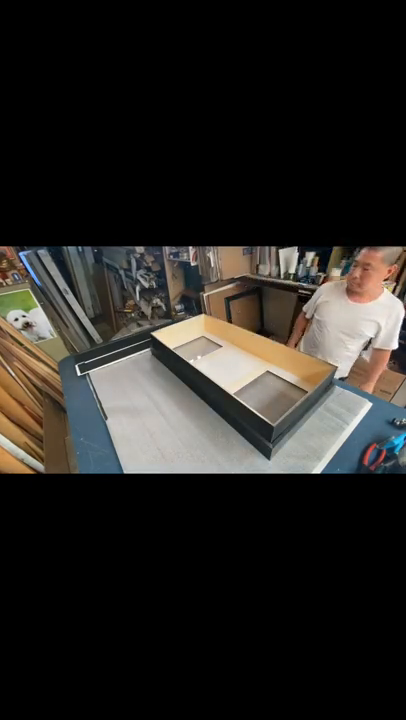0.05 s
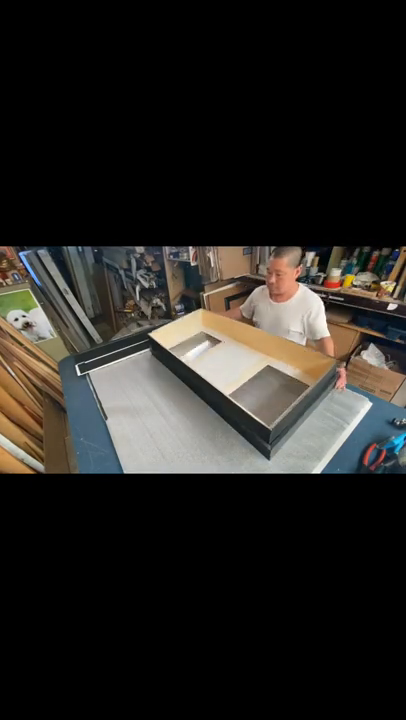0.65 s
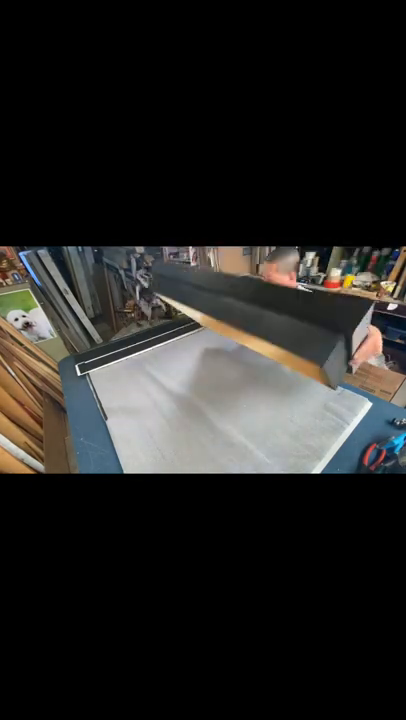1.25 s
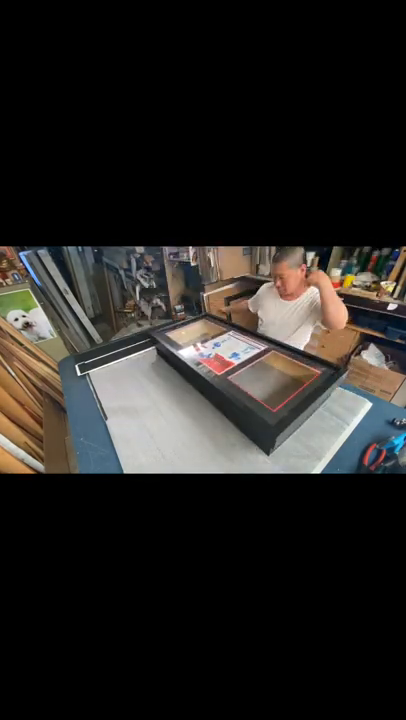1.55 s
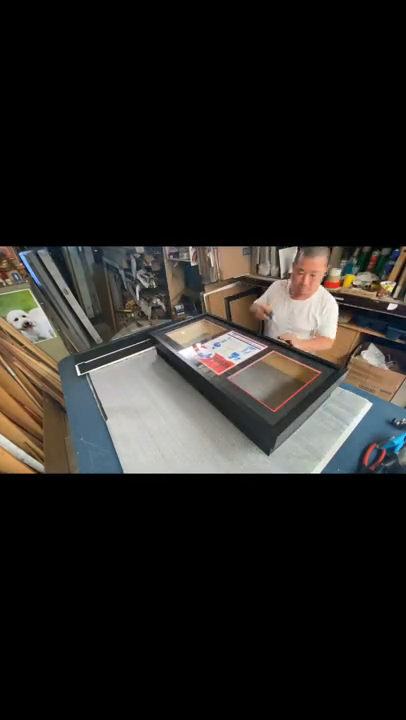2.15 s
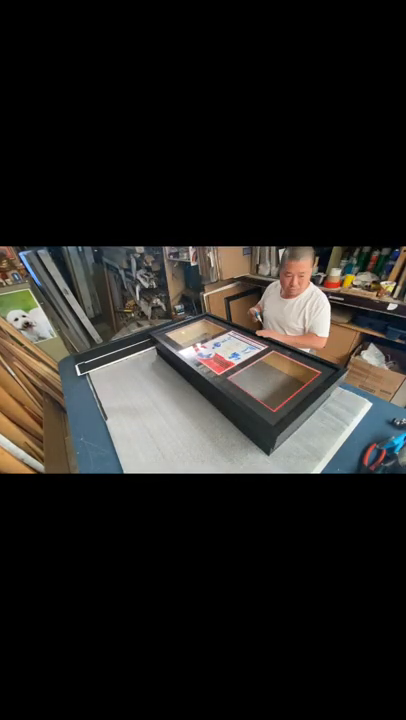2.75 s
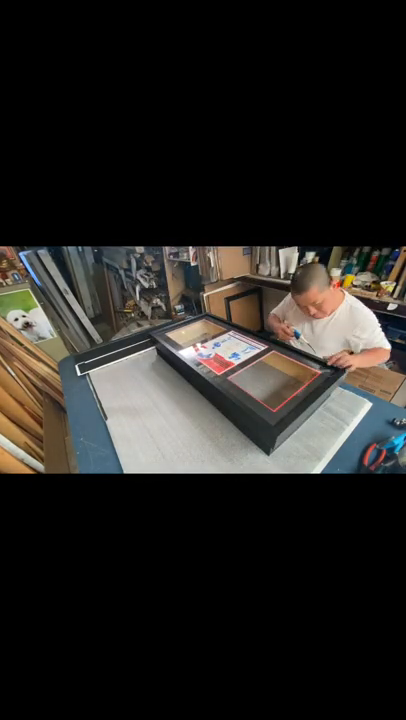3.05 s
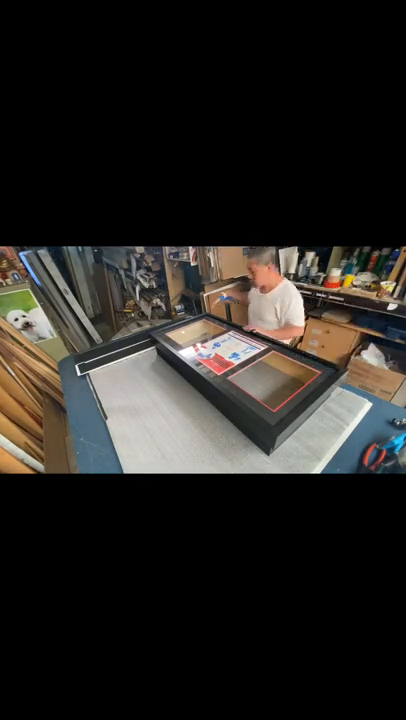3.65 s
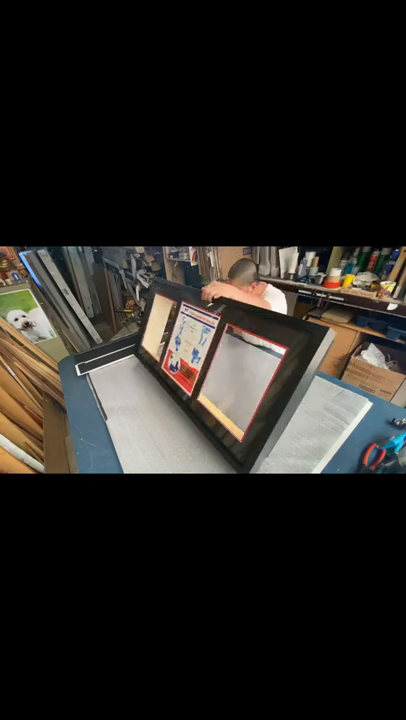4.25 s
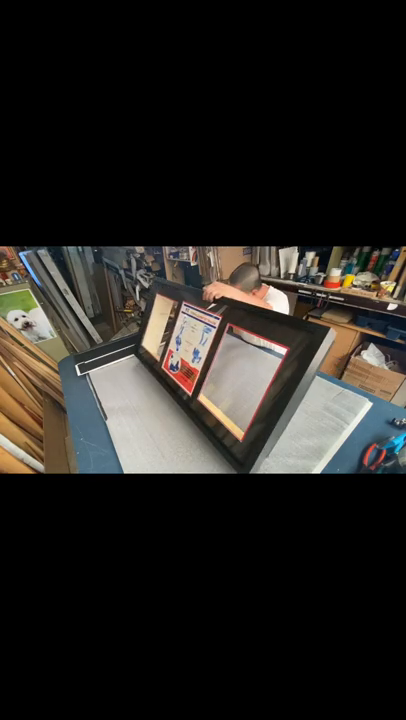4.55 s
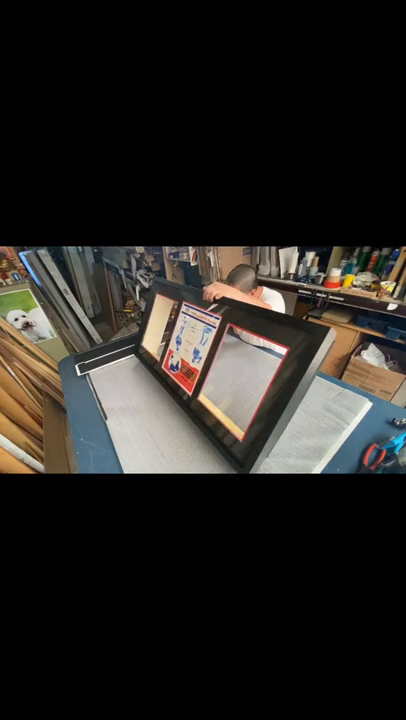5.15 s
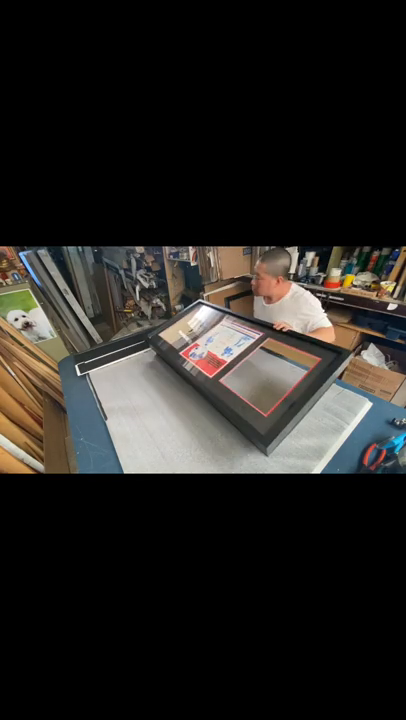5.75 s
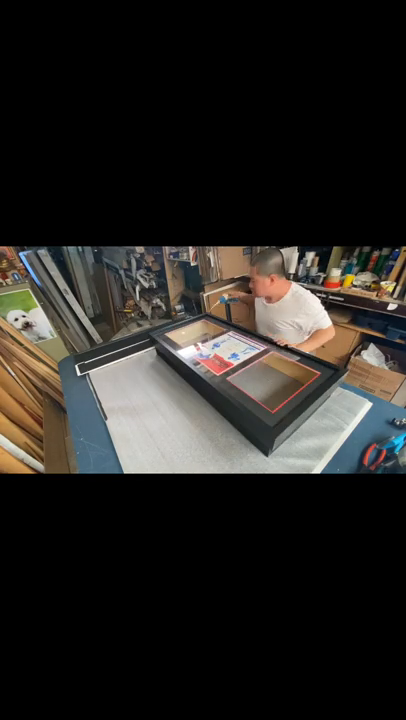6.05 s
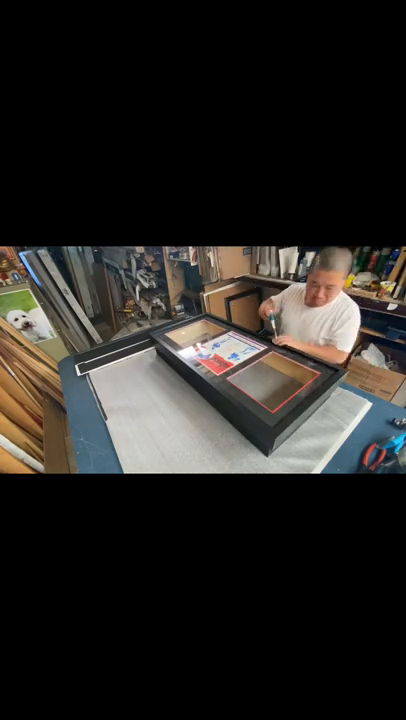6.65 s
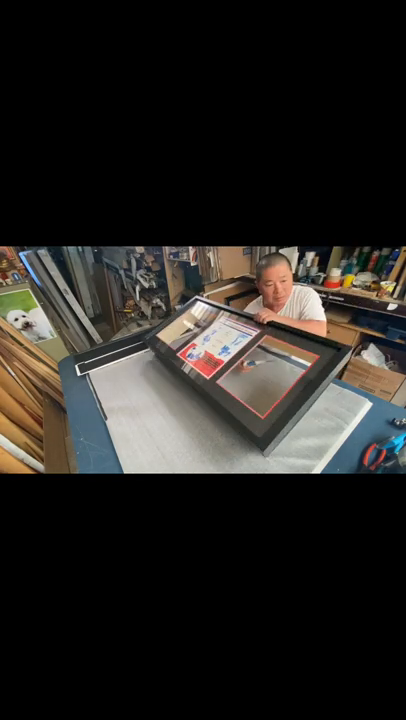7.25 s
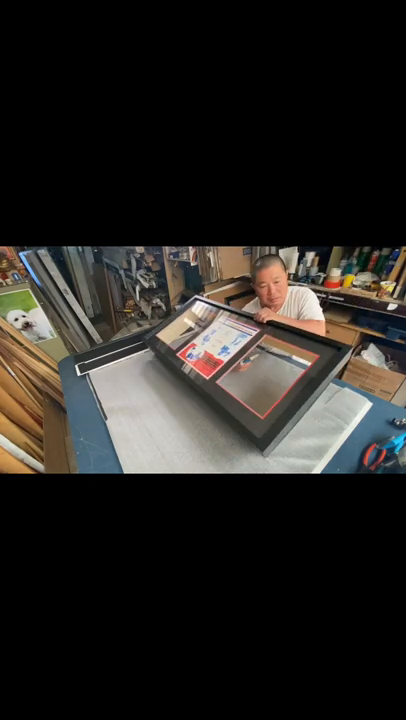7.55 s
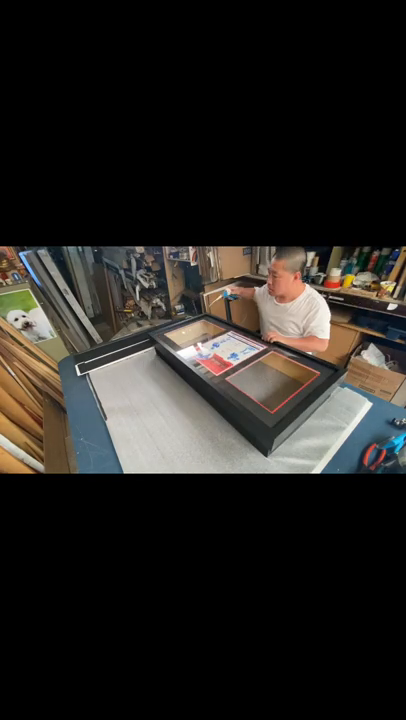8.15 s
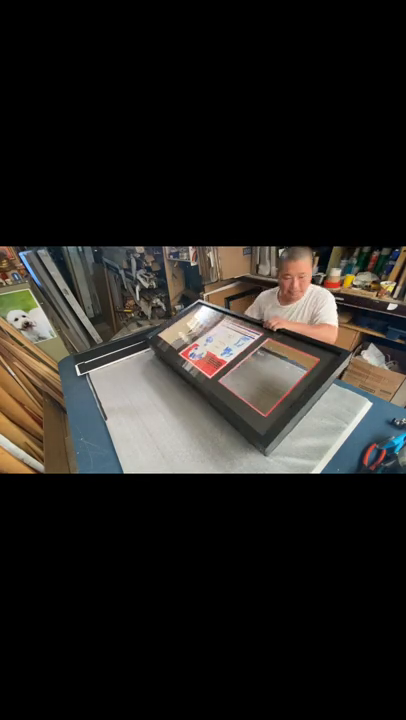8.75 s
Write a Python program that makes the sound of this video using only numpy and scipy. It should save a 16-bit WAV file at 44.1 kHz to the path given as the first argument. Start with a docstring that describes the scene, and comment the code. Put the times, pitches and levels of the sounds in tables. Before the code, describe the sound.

A small compressor hums and buzzes in a workshop. A wooden box frame squeaks and bumps softly as it is turned over. Then an air gun blows it out in repeated short and long bursts, bright and hissing in the open, harsh on the edges and hollow inside the box. The jet sometimes whistles in gaps and puffs against the microphone, while the hum continues behind.

```python
"""Air gun and compressor in a workshop.

Dust is blown out of a wooden box frame. The turbulent jet hisses in bursts: bright in free air, harsh
on the edges, hollow where it excites the box's air resonances. It sings in gaps and buffets the
microphone in passing; the handled frame squeaks and bumps. Behind it are faint sinking tones and the
harmonic hum of a small piston compressor, which ducks during bursts in free air and creeps back."""
import sys
import numpy as np
from scipy import signal
from scipy.fft import rfft, irfft, next_fast_len
from scipy.io import wavfile
from scipy.ndimage import uniform_filter1d, map_coordinates

SR = 44100
rng = np.random.default_rng(int(sys.argv[2]) if len(sys.argv) > 2 else 0)


def materialize(psi):
    """Save the field psi as 16-bit PCM at rate SR to the path in sys.argv[1].

    A 1-D psi becomes a single channel; in a 2-D psi each row is a channel.
    """
    bounded = np.clip(np.atleast_2d(psi).T, -1, 1)
    quanta = np.round(bounded * 32767).astype(np.int16)
    wavfile.write(sys.argv[1], SR, quanta)


N = 392040
TIME = np.arange(N) / SR
CUTOFF_HZ = 15750

# Distant sinking tones, one curve each: t/s, f/Hz, level/dB
FAR_GLIDES = [
    [(.05, 485, -67), (.22, 475, -47), (.38, 460, -55), (.55, 444, -46), (.8, 430, -52)],
    [(.1, 945, -56), (.28, 950, -64), (.65, 885, -56), (.8, 816, -48), (1.05, 775, -56)],
    [(6.55, 401, -86), (6.85, 378, -62), (7.2, 379, -68), (7.45, 361.3, -64), (7.75, 351.5, -62.5),
     (8.0, 348, -89)],
]

# Compressor speed: t/s, stroke rate/Hz
STROKE_RATE = [(0, 127.12), (1, 127.04), (6, 127.06), (7, 127.14), (8.9, 127.16)]
# Its harmonics: multiple of the stroke rate, mid level/dB (common to both channels), side level/dB
HARMONICS = [(2, -39.5, -110), (4, -47.5, -59), (6, -57.5, -88), (8, -51.5, -74), (10, -50, -58),
             (12, -51.5, -59), (13, -55, -75), (14, -55.5, -61), (15, -55, -76), (16, -58.5, -63),
             (17, -75, -74), (18, -52, -62), (19, -46.5, -62), (20, -54.5, -55), (21, -56.5, -60),
             (23, -58.5, -51), (25, -59.5, -64), (26, -52, -49), (27, -55.5, -52), (28, -60, -56),
             (29, -58.5, -59), (30, -67, -65), (31, -83, -67), (32, -75, -52), (34, -47.5, -45),
             (35, -52, -51), (36, -59, -57), (37, -53, -45), (38, -55.5, -52), (39, -51, -53),
             (40, -63, -58), (41, -59.5, -59), (47, -68, -53), (48, -57, -60), (49, -52.5, -57),
             (50, -61, -59), (51, -67, -59), (52, -55.5, -63), (54, -77, -59), (55, -78, -57)]
# Harmonic group gains: t/s, buzz/dB, ring/dB, mid whine/dB, side whine/dB
GROUP_GAINS = [(0, -2.5, 1.5, -3.5, -3), (.4, -0.5, 4.5, -4, -1), (.7, 3.5, 4, -3, 0),
               (1.1, 0.5, 6.5, -4, -2), (1.35, 2, 3.5, -2, 0), (1.7, 0.5, 2, 2, -1), (2.3, 0.5, 3, 1, 2),
               (2.8, 4.5, 5.5, 1, 3), (3.6, 1, 3.5, -0.5, -1), (5.2, 2.5, 7.5, -4.5, -2),
               (5.75, 3.5, 2, -3, 0), (6.5, 2, 5, 3.5, 2), (7.5, 5.5, 6, -6.5, 1), (8.1, 3.5, 2, 0, 0),
               (8.89, 6, 5, 0, 3)]
# Weak top harmonics: f/Hz, typical level/dB
FIZZ_SPECTRUM = [(7000, -73), (9000, -71), (11500, -79), (14500, -90)]
# Modes of the pump's loose parts: f/Hz, bandwidth/Hz, level/dB
CASING_MODES = [(2634, 46, -52.5), (3190, 54, -59), (5220, 50, -56), (7850, 90, -61.5), (10500, 60, -67.5)]
# Air and valve noise of the pump: f/Hz, relative density/dB
PUMP_SPECTRUM = [(40, -37), (100, -35), (135, -18.5), (170, -17), (220, 2.5), (300, 5.5), (420, -1),
                 (620, -3), (900, -8.5), (2000, -6.5), (3200, -9), (4800, -3), (5700, -9.5), (9000, -16.5),
                 (15500, -30.5)]
# Its stereo image: f/Hz, coherence, left phase lead/rad
PUMP_COHERENCE = [(60, .45, 0), (160, .95, 0), (300, .88, 0), (1200, .65, .4), (2400, .55, 1.1),
                  (3300, .6, 1.9), (4700, .65, 2.4), (6500, .45, 3.1), (9000, .45, 4.2), (12000, .4, 5.6),
                  (15500, .3, 7.2)]
# The hum ducks during bursts in free air: start/s, end/s, initial gain/dB
HUM_DUCKS = [(1.768, 2.503, -15.5), (3.417, 3.747, -17), (5.933, 6.598, -15), (8.19, 8.52, -17)]
# Brief dips of the low drone: t/s, half length/s, gain/dB
DRONE_DIPS = [(2.57, 0.13, -15.5), (6.678, 0.055, -9), (7.918, 0.026, -14), (8.007, .025, -12),
              (8.6, 0.14, -13.5)]

# Squeaks as the frame is gripped and turned: t/s, f/Hz, peak/dB
GRIP_SQUEAKS = [(.38, 3520, -31), (.425, 5240, -34), (.62, 3170, -28), (.98, 3480, -27.5),
                (4.77, 6130, -38), (4.83, 6130, -32), (1.58, 3520, -30), (1.725, 10300, -39),
                (2.608, 2280, -47), (5.63, 3550, -39), (5.832, 2900, -37)]
# Bumps as it is tipped over and laid down: t/s, level/dB
FRAME_BUMPS = [(1.02, -31), (1.625, -32)]
# Low modes of the frame: f/Hz, bandwidth/Hz, relative level/dB
FRAME_MODES = [(296, 23, 0), (345, 50, -6), (460, 50, -5), (600, 64, -3)]

# The jet sweeps past the microphone: t/s, half length/s, small puff level/dB, low rush level/dB
PASSING_GUSTS = [(2.421, 0.09, -44, -59), (6.562, 0.054, -44, -55), (8.421, 0.1, -49, -59)]
# The strongest puffs: t/s, level/dB, half length/s, upper band edge/Hz
STRONG_PUFFS = [(2.35, -40, .003, 1600), (2.379, -32, .005, 620), (2.388, -31, 0.005, 700),
                (2.416, -38, 0.0046, 600), (2.437, -27, 0.0044, 1100), (2.447, -35, .004, 700),
                (2.474, -30, 0.0018, 2200), (2.478, -39, .003, 600), (2.503, -43, .003, 1500),
                (2.542, -41, 0.0033, 1300), (2.553, -38, 0.0022, 1700), (3.016, -42, 0.014, 600),
                (3.542, -40, 0.008, 800), (5.226, -34, 0.0026, 1500), (5.322, -31, 0.005, 3800),
                (5.457, -27.5, 0.0041, 2600), (6.532, -31.5, .004, 1700), (6.545, -32.5, 0.0044, 1100),
                (6.558, -32.5, 0.0058, 800), (6.57, -36, .004, 650), (6.596, -38, 0.0056, 600),
                (6.61, -33, 0.006, 620), (8.371, -33, 0.004, 750), (8.387, -37, .004, 900),
                (8.434, -35, 0.0065, 650), (8.461, -38, .004, 500), (8.57, -42, .007, 800),
                (8.593, -42, 0.0047, 600)]

# Bottle-like hums of the box: t/s, half length/s, f/Hz, level/dB
CAVITY_HUMS = [(7.382, .022, 277.6, -47), (7.43, .02, 275, -51)]
# Air resonances of the box: f/Hz, bandwidth/Hz, gain/dB
BOX_MODES = [(656, 70, -2), (922, 150, -3.5), (1222, 108, 0.5), (1625, 180, -1), (1950, 1100, -11)]
# The jet sings in gaps: start/s, end/s, f/Hz, bandwidth/Hz, level/dB
GAP_TONES = [(2.67, 2.786, 8350, 500, -46), (2.674, 2.798, 13400, 400, -45), (3.41, 3.462, 1640, 170, -48),
             (4.19, 4.43, 1250, 260, -55), (4.22, 4.45, 1850, 300, -59), (4.367, 4.563, 11700, 2200, -41),
             (4.4, 5.097, 6120, 70, -52), (4.535, 4.672, 4190, 83, -44), (4.55, 4.721, 1230, 55, -49.5),
             (4.553, 4.7, 1830, 100, -45), (4.64, 4.74, 6700, 230, -43), (4.883, 5.156, 7600, 4000, -38),
             (4.921, 4.942, 1106, 110, -40.5), (4.98, 5.12, 13400, 350, -40), (5.0, 5.1, 7700, 200, -42),
             (5.3, 5.309, 7600, 200, -44), (5.322, 5.333, 1100, 250, -40.5), (5.36, 5.369, 1400, 300, -46),
             (5.752, 5.816, 1050, 180, -41.5), (6.752, 6.768, 1500, 900, -49),
             (6.822, 6.845, 1750, 350, -46.5), (8.307, 8.33, 1280, 90, -51), (7.1, 7.65, 1610, 150, -57),
             (7.227, 7.542, 11300, 690, -42.5)]
# Resonances of one corner: f/Hz, bandwidth/Hz, relative level/dB
CORNER_MODES = [(873, 47, -5.5), (1660, 240, -2), (2180, 270, -8), (2900, 380, 0)]
# The jet is aimed into that corner: start/s, end/s, level/dB
CORNER_AIMS = [(7.066, 7.214, -48.5), (7.516, 7.587, -50.5), (7.76, 7.845, -44.5), (8.76, 8.897, -49)]

# Hiss of the free jet: f/Hz, relative density/dB
HISS_SPECTRUM = [(100, -39), (170, -14.5), (300, -6), (600, -9.5), (1200, -9), (3000, -11), (6000, -4.5),
                 (9000, -1), (12000, 1.5), (15800, 3)]
# Its stereo image: f/Hz, coherence, left phase lead/rad
HISS_COHERENCE = [(200, 0.06, 1.5), (1500, 0.25, -2), (3000, 0, 0.5), (5900, 0.35, -2), (10000, 0.55, -0.5),
                  (15000, 0.4, -0.8)]
# Splash of air on wooden edges: f/Hz, relative density/dB
SPLASH_SPECTRUM = [(200, -43), (700, -48), (1400, -11), (2200, 0), (4000, -1), (7000, 2.5), (10000, 1),
                   (15800, 0)]
# Its stereo image, scattered by the wood: f/Hz, coherence, left phase lead/rad
SPLASH_COHERENCE = [(200, .6, 0), (1500, 0.8, 2), (3000, 0.4, 0.8), (6150, 0.2, 4.5), (15000, 0.3, -6.5)]
# Travel of the nozzle across the bench: t/s, added delay on the right/microseconds
NOZZLE_DELAY = [(1.8, 23), (2.0, 22), (2.25, 3), (2.42, 6), (2.52, 1), (2.66, -75), (2.88, -100),
                (3.02, -100), (3.41, -9), (3.56, 32), (3.9, 24), (5.95, 27), (6.15, 18), (6.35, -10),
                (6.5, 1), (6.7, 20), (7.3, -2), (8.0, 30), (8.2, -12), (8.4, 6), (8.52, 1)]
# Bursts of one tone colour, steadily rising or falling:
# opening/s, closing/s, hiss/dB, splash/dB, box/dB, fall over the burst/dB
PLAIN_BURSTS = [(1.75, 2.509, -37.5, -62, -56.5, -0.5), (2.652, 2.803, -43.5, -41, -54, -2.5),
                (2.873, 3.005, -37.5, -45, -56, 7), (3.409, 3.811, -42.5, -56.5, -75, -2.5),
                (3.897, 3.961, -46.5, -54.5, -55.5, -4), (5.223, 5.462, -51, -43, -48, -4),
                (5.733, 5.823, -63, -51.5, -50, 3), (5.912, 6.838, -36, -48.5, -57, 5.5),
                (7.973, 8.101, -42, -48, -49.5, -1.5), (8.141, 8.528, -42.5, -58, -58.5, -4.5),
                (8.779, 8.95, -54, -48, -57.5, -12)]
# Bursts swept along the inside of the frame, one curve each: t/s, hiss/dB, splash/dB, box/dB
SWEPT_BURSTS = [
    [(4.178, -46, -47.5, -48.5), (4.33, -55, -46.5, -53), (4.375, -40, -40, -54), (4.52, -60, -38.5, -48.5),
     (4.6, -63, -36.5, -42.5), (4.725, -40, -36, -50), (4.795, -50, -49.5, -48), (4.835, -52, -39, -49),
     (4.97, -36.5, -38.5, -50.5), (5.132, -36, -38, -45.5)],
    [(7.078, -46, -52, -47), (7.16, -48, -35, -54), (7.24, -45, -45.5, -62), (7.38, -49, -39.5, -56),
     (7.49, -38.5, -42.5, -58), (7.55, -46, -43, -56), (7.6, -56, -51, -50.5), (7.74, -56, -53.5, -49.5),
     (7.8, -45, -43.5, -58), (7.837, -57, -42, -52)],
]
# The jet catches or slips off an edge: t/s, half length/s, jet gain/dB, further splash gain/dB
EDGE_SPITS = [(2.713, 0.047, -4.5, 10), (3.423, 0.013, 11, 8), (3.445, 0.017, 5.5, -4),
              (3.545, 0.0055, 5, 9), (3.58, 0.0079, 6.5, 5), (3.618, .009, 5.5, 0), (3.652, 0.013, 6, 0),
              (3.796, 0.015, 3, 10.5), (4.243, .005, 4, -7), (4.288, .005, 4.5, -9),
              (4.567, 0.0083, 8.5, -2.5), (4.664, 0.0086, 0.5, 3), (4.695, .008, -1, 0),
              (4.903, 0.0057, 4.5, 3.5), (4.957, .008, 3, -7), (5.3, 0.013, 3.5, 1.5), (5.323, .005, 3, 1),
              (5.355, .02, 0.5, -3), (5.405, .012, 1, 1), (5.456, .01, 4, -6), (5.791, 0.026, 12.5, -2),
              (6.308, 0.067, 5, -5), (6.83, 0.021, 2, 17.5), (7.287, 0.012, 8.5, -12), (8.206, .008, 5, 6),
              (8.236, 0.078, 7.5, -2)]


def from_db(db):
    """Amplitude ratio of a level in decibels."""
    return np.exp(np.asarray(db) * np.log(10) / 20)


def unit_rms(x):
    """Normalisation to unit mean square."""
    return x / np.sqrt(np.mean(x ** 2) + 1e-20)


def in_time(rows):
    """Linear interpolation of each column at every sample."""
    times, *columns = np.transpose(rows)
    return [np.interp(TIME, times, column) for column in columns]


def at_hz(rows, hz):
    """Interpolation of each column on a logarithmic frequency axis."""
    knots, *columns = np.transpose(rows)
    return [np.interp(np.log(hz + 1e-9), np.log(knots), column) for column in columns]


def hump(middle, half_length):
    """A Gaussian envelope of height 1."""
    return np.exp(-np.minimum(((TIME - middle) / half_length) ** 2, 50))


def drift(hz, hop=100):
    """Random modulation: low-passed noise of unit rms."""
    r = np.exp(-2 * np.pi * hz * hop / SR)
    slow = signal.lfilter([1], [1, -2 * r, r * r], rng.standard_normal(N // hop + 1002))[1000:]
    return np.interp(np.arange(N) / hop, np.arange(len(slow)), unit_rms(slow))


def filtered(x, order, hz, kind="low"):
    """A maximally flat filter."""
    return signal.sosfilt(signal.butter(order, hz, kind, fs=SR, output="sos"), x)


def resonate(x, hz, width):
    """Forced response of a damped oscillator, with unit gain at resonance."""
    r = np.exp(-np.pi * width / SR)
    poles = [1, -2 * r * np.cos(2 * np.pi * hz / SR), r * r]
    return signal.lfilter(np.array([1, 0, -1]) * (1 - r * r) / 2, poles, x)


def add_transient(out, start_s, x, peak_db):
    """Superposition of a short sound, scaled to a given peak."""
    start = round(start_s * SR)
    out[..., start:start + x.shape[-1]] += from_db(peak_db) * x / np.abs(x).max()


def stereo_noise(spectrum, image):
    """Partial coherence: the channels share a phase-shifted part of a coloured noise."""
    size = next_fast_len(N)
    hz = np.arange(size // 2 + 1) * SR / size
    left, independent = rfft(rng.standard_normal((2, size)))
    coherence, lead = at_hz(image, hz)
    right = coherence * np.exp(-1j * lead) * left + np.sqrt(1 - coherence ** 2) * independent
    colour = from_db(at_hz(spectrum, hz)[0])
    return unit_rms(irfft(np.array([left, right]) * colour, size)[:, :N])


def far_tones(relative_width=.035, waver_db=2.0, fade_s=0.037):
    """Random quadrature modulation smears each faint, sinking tone into a narrow band of noise."""
    out = np.zeros(N)
    for curve in FAR_GLIDES:
        hz, level_db = in_time(curve)
        gate = np.clip(np.minimum(TIME - curve[0][0], curve[-1][0] - TIME) / fade_s, 0, 1)
        phase = 2 * np.pi * np.cumsum(hz) / SR
        width_hz = relative_width * curve[0][1]
        band = drift(width_hz) * np.sin(phase) + drift(width_hz) * np.cos(phase)
        out += gate * from_db(level_db + waver_db * drift(30)) * band
    return out


def hum_gains(start_db=-4.5, full_db=1, recover_db_per_s=5, sink_db_per_s=8.5, duck_s=0.015):
    """Ducking of rattle and drone: both drop, sink and recover exponentially; the drone also dips."""
    level = start_db + recover_db_per_s * TIME
    for begins, ends, ducked_db in HUM_DUCKS:
        sunk = sink_db_per_s * (np.minimum(TIME, ends) - begins)
        recovered = recover_db_per_s * np.maximum(TIME - ends, 0)
        level = np.where(TIME > begins, ducked_db - sunk + recovered, level)
    level = uniform_filter1d(np.minimum(level, full_db), int(duck_s * SR))
    dips = sum(db * hump(middle, half_length) for middle, half_length, db in DRONE_DIPS)
    return from_db([level, level + 0.84 + dips])


def casing_rasp(stroke, sharpness=1.3, flicker_db=4.5, flicker_hz=18):
    """Forced vibration: a noise pulse on each stroke rings the loose parts, whose levels flicker."""
    noise = rng.standard_normal((2, N)) * .5 + rng.standard_normal(N)
    knocks = noise * np.exp(sharpness * np.cos(stroke))
    out = np.zeros((2, N))
    for hz, width, db in CASING_MODES:
        flicker = from_db(flicker_db * np.minimum(drift(flicker_hz), 1))
        out += from_db(db) * unit_rms(resonate(knocks, hz, width) * flicker)
    return out


def fizz(stroke, size=2048):
    """A cycle repeated every stroke has a line spectrum: weak top harmonics, uneven in each channel."""
    hz = np.arange(size // 2 + 1) * STROKE_RATE[0][1]
    lines = rng.standard_normal((2, len(hz))) + 1j * rng.standard_normal((2, len(hz)))
    lines *= from_db(at_hz(FIZZ_SPECTRUM, hz)[0]) * (hz > FIZZ_SPECTRUM[0][0]) * (hz < CUTOFF_HZ)
    angle = np.arange(size) * 2 * np.pi / size
    cycles = irfft(lines * size / 2, size)
    return np.array([np.interp(stroke % (2 * np.pi), angle, cycle) for cycle in cycles])


def pump_flow(stroke, split_hz, waver_db, throb=0.054, flutter_db=1.1, flutter_hz=45):
    """Unsteady flow gives broadband noise: a wavering rumble, and valve hiss pulsed by the strokes."""
    rush = stereo_noise(PUMP_SPECTRUM, PUMP_COHERENCE)
    rumble = filtered(rush, 1, split_hz)
    pulsation = unit_rms((1 + throb * np.cos(stroke)) * from_db(flutter_db * drift(flutter_hz)))
    valves = filtered((rush - rumble) * pulsation, 2, 170, "high")
    return rumble * from_db(waver_db * drift(16)), valves


def from_the_left(x, shadow_hz=2200, shadow_db=0.9):
    """Acoustic shadowing affects only short waves, so the treble is louder on the near side."""
    treble = filtered(x, 1, shadow_hz, "high")
    return x + treble * (from_db([[shadow_db], [-shadow_db]]) - 1)


def compressor(waver_db=1.5, drone_waver_db=2.5, flow_db=-35.5, drone_top_hz=380):
    """Periodic excitation: the piston's repeated clatter forms a harmonic series over its flow noise."""
    rattle, drone = hum_gains()
    buzz, ring, whine, side_whine = rattle * from_db(in_time(GROUP_GAINS))
    stroke = 2 * np.pi * np.cumsum(in_time(STROKE_RATE)[0]) / SR
    mid, side = np.zeros((2, N))
    for multiple, mid_db, side_db in HARMONICS:
        hz = multiple * STROKE_RATE[0][1]
        in_phase = 2200 < hz < 3000   # these lines add up to a knock on every stroke
        phase = multiple * stroke + rng.uniform(0, 2 * np.pi) * (not in_phase)
        if hz < drone_top_hz:   # long waves reach both channels alike
            gain = drone * from_db(drone_waver_db * drift(20))
        else:
            group = whine if hz > 4000 else ring if hz > 3000 else buzz if hz > 2200 else rattle
            gain = group * from_db(waver_db * drift(4))
            spread = side_whine / whine if hz > 4000 else 1
            side += from_db(side_db) * gain * spread * np.cos(phase)   # quadrature: the left leads
        mid += from_db(mid_db) * gain * np.sin(phase)
    lines = np.sqrt(2) * np.array([mid + side, mid - side])
    rumble, valves = pump_flow(stroke, drone_top_hz, drone_waver_db)
    flow = from_db(flow_db) * (drone * rumble + rattle * valves)
    return from_the_left(lines + buzz * casing_rasp(stroke) + rattle * fizz(stroke) + flow)


def squeaks(half_length_s=.01, width_hz=180):
    """Friction: a short slip of wood excites one narrow resonance."""
    out = np.zeros((2, N))
    t = np.arange(-SR // 20, SR // 20) / SR
    for s, hz, peak_db in GRIP_SQUEAKS:
        ring = resonate(rng.standard_normal((2, len(t))), hz, width_hz)
        add_transient(out, s + t[0], ring * np.exp(-(t / half_length_s) ** 2), peak_db)
    return out


def bumps(contact_s=0.014):
    """Soft impact: a scuff on the padded bench excites the frame's low modes."""
    out, t = np.zeros(N), TIME[:SR // 4]
    for s, peak_db in FRAME_BUMPS:
        scuff = rng.standard_normal(len(t)) * np.exp(-t / contact_s)
        ring = sum(from_db(db) * unit_rms(resonate(scuff, hz, width)) for hz, width, db in FRAME_MODES)
        add_transient(out, s, ring, peak_db)
    return out


def workshop_reverb(x, level_db=-12, t60_s=0.22, wall_hz=7000):
    """Reverberation: the cluttered room adds a short exponential tail, dulled by absorption."""
    t = TIME[:SR // 2]
    tail = rng.standard_normal((2, len(t))) * from_db(-60 * t / t60_s) * (t > .004)
    tail /= np.sqrt(np.sum(tail ** 2, axis=1, keepdims=True))
    return from_db(level_db) * signal.fftconvolve(x, filtered(tail, 1, wall_hz), axes=1)[:, :N]


def wash(band_hz=(210, 430), lead_s=0.081, half_length_s=0.1):
    """A jet spreads: its broad edge reaches the microphone as a low rush ahead of each gust."""
    noise = rng.standard_normal(N) + .5 * rng.standard_normal((2, N))
    swells = sum(from_db(db) * hump(s - lead_s, half_length_s) for s, _, _, db in PASSING_GUSTS)
    return unit_rms(filtered(noise, 2, band_hz, "band")) * swells


def small_puffs(per_s=45, spread_db=-1.5, half_length_s=0.0049, top_hz=1300):
    """A gust breaks into small puffs, slightly louder towards its ends; rows as in STRONG_PUFFS."""
    rows = []
    for middle, reach_s, peak_db, _ in PASSING_GUSTS:
        places = np.linspace(-1, 1, max(round(2 * reach_s * per_s), 2))
        for place, (jitter, size) in zip(places, rng.standard_normal((len(places), 2))):
            s = middle + place * reach_s + jitter / (np.pi * per_s)
            rows.append((s, peak_db + spread_db * (size - 2 * place ** 2), half_length_s, top_hz))
    return rows


def buffets(low_hz=240, shared=0.1):
    """Eddies striking the microphone give dull pressure pulses, largely unlike in the two channels."""
    out = np.zeros((2, N))
    t = np.arange(-SR // 20, SR // 20) / SR
    for s, peak_db, half_length, top_hz in STRONG_PUFFS + small_puffs():
        eddies = rng.standard_normal((3, len(t))) * np.exp(-2 * (t / half_length) ** 2)
        pressure = shared * eddies[2] + (1 - shared) * eddies[:2]
        add_transient(out, s + t[0], filtered(pressure, 2, [low_hz, top_hz], "band"), peak_db)
    return out


def box_hums():
    """Cavity resonance: blown across its opening, the box hums briefly like a bottle."""
    out = np.zeros(N)
    for s, half_length, hz, db in CAVITY_HUMS:
        tone = np.sqrt(2) * np.sin(2 * np.pi * hz * TIME + rng.uniform(0, 2 * np.pi))
        out += from_db(db) * hump(s, half_length) * tone
    return out


def singing_gaps(incoherent_hz=3000):
    """Flow-excited resonance: gaps and a corner ring in bands that swell as the nozzle passes."""
    out = np.zeros((2, N))
    corner = [(begins, ends, hz, width, aim_db + db)
              for begins, ends, aim_db in CORNER_AIMS for hz, width, db in CORNER_MODES]
    for begins, ends, hz, width, level_db in GAP_TONES + corner:
        span = np.flatnonzero((TIME > begins) & (TIME < ends))
        mid, side = resonate(rng.standard_normal((2, SR)), hz, width)[:, SR - len(span):]
        ring = unit_rms(mid + min(hz / incoherent_hz, 1) * side * [[1], [-1]])
        swell = np.sqrt(np.abs(np.sin(np.pi * (TIME[span] - begins) / (ends - begins))))
        out[:, span] += from_db(level_db) * swell * ring
    return out


def box_rush(flutter_db=5.0, side_gain=0.11):
    """Turbulence drives the air modes of the box, each with a fluctuating strength."""
    mid, side = rng.standard_normal((2, N))
    eddies = mid + side_gain * side * [[1], [-1]]
    out = np.zeros((2, N))
    for k, (hz, width, db) in enumerate(BOX_MODES):
        out += (-1) ** k * resonate(eddies, hz, width) * from_db(db + flutter_db * np.tanh(drift(19)))
    return unit_rms(out)


def splash_grit(low_hz=2600, high_hz=14000, width_hz=70, flicker_db=7, flicker_hz=32, count=44):
    """Random modulation: narrow resonances flicker in the splash, giving it a gritty, ragged texture."""
    out, noise = np.zeros((2, N)), rng.standard_normal((2, N))
    for k, hz in enumerate(np.linspace(low_hz, high_hz, count) * rng.uniform(1.0, 1.04, count)):
        flicker = from_db(flicker_db * np.minimum(drift(flicker_hz), 1.5))
        out += resonate(noise[k % 2], hz, width_hz) * flicker * rng.uniform(.5, 1, (2, 1))
    return unit_rms(out)


def sputter(catches_per_s=35, depth_db=5.5, decay_s=.003):
    """A shot process: the gain flares briefly whenever the jet catches a splinter or a joint."""
    catches = (rng.random(N) < catches_per_s / SR) * rng.uniform(.3, 1, N)
    flare = signal.lfilter([1], [1, -np.exp(-1 / (decay_s * SR))], catches + 1e-18)
    return from_db(depth_db * np.minimum(flare, 1.3))


def off_the_wood(x, reflection, sway, spacing_s=0.0015, count=4):
    """Interference with echoes off frame and bench forms comb filters that sweep as the nozzle moves."""
    out = x.copy()
    path_stretch = np.exp(sway * drift(1.343))
    for channel in range(2):
        for k in range(count):
            delay_s = spacing_s * (k + rng.uniform(0.513, 1.5)) * path_stretch
            out[channel] += reflection * (-1) ** k * np.interp(TIME - delay_s, TIME, x[channel])
    return unit_rms(out)


def from_the_nozzle(x):
    """Path difference: the moving nozzle shifts the arrival time in the right channel."""
    lag_s = in_time(NOZZLE_DELAY)[0] * 1e-6
    return np.array([x[0], map_coordinates(x[1], [(TIME - lag_s) * SR], order=3)])


def valve(opens, closes, opening_s=0.009, emptying_s=0.0075):
    """Flow rises quickly as the valve opens and decays exponentially as the nozzle empties."""
    opening = np.clip((TIME - opens) / opening_s + .5, 0, 1)
    return opening * np.exp(-np.clip((TIME - closes) / emptying_s, 0, 20))


def jet_gains(surge_db=3, surge_s=0.075):
    """Pressure and aim set hiss, splash and box gains; stored hose pressure makes plain bursts surge."""
    gains = np.zeros((3, N))
    for opens, closes, hiss_db, splash_db, box_db, fall_db in PLAIN_BURSTS:
        age = np.clip(TIME - opens, 0, closes - opens)
        strength = from_db(surge_db * np.exp(-age / surge_s) - fall_db * age / (closes - opens))
        gains += from_db([[hiss_db], [splash_db], [box_db]]) * valve(opens, closes) * strength
    for aim in SWEPT_BURSTS:
        gains += from_db(in_time(aim)) * valve(aim[0][0], aim[-1][0])
    spits_db = sum(np.outer([jet_db, jet_db + splash_db, jet_db], hump(s, half_length))
                   for s, half_length, jet_db, splash_db in EDGE_SPITS)
    return gains * from_db(spits_db)


def air_gun(flutter_db=1.45, splash_db=-2.0, grit_db=-4, box_db=-4.0, pan_db=-0.5):
    """Turbulent jet noise, gated by the trigger and shared among free air, wooden edges and the box."""
    free, edge, inside = jet_gains()
    hiss = from_the_nozzle(stereo_noise(HISS_SPECTRUM, HISS_COHERENCE))
    hiss = off_the_wood(hiss, reflection=0.3, sway=0.05)
    splash = off_the_wood(stereo_noise(SPLASH_SPECTRUM, SPLASH_COHERENCE), reflection=0.45, sway=0.069)
    splash = (splash + from_db(grit_db) * splash_grit()) * sputter()
    jet = free * hiss + from_db(splash_db) * edge * splash + from_db(box_db) * inside * box_rush()
    return from_db(flutter_db * drift(19.5)) * jet * from_db([[pan_db], [-pan_db]])


def scene(low_cut_hz=170):
    """Superposition of all sources; a high-pass takes the deep bass out of the jet, puffs and bumps."""
    jet = air_gun() + singing_gaps() + box_hums()
    foreground = jet + workshop_reverb(jet) + buffets() + wash() + bumps()
    return compressor() + filtered(foreground, 2, low_cut_hz, "high") + squeaks() + far_tones()


def record(dry, fade_in_s=.006):
    """Band limiting by a steep low-pass, after a short fade that prevents a click."""
    low_pass = signal.ellip(12, .1, 90, CUTOFF_HZ, fs=SR, output="sos")
    return signal.sosfilt(low_pass, dry * np.minimum(TIME / fade_in_s, 1))


dry = scene()
out = record(dry)
materialize(out)
```